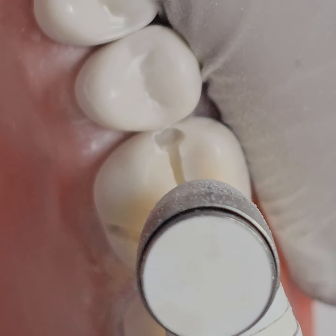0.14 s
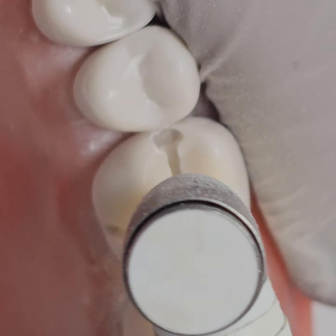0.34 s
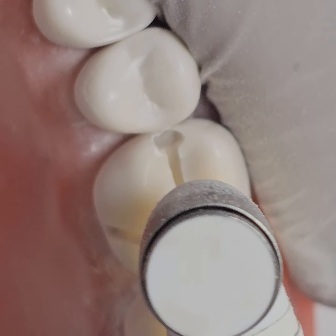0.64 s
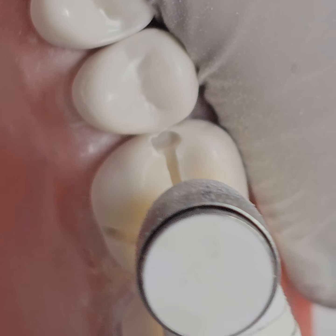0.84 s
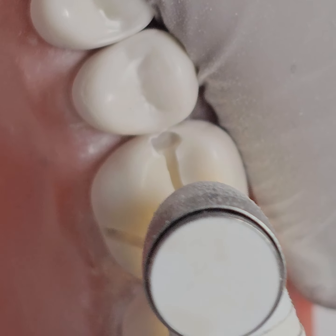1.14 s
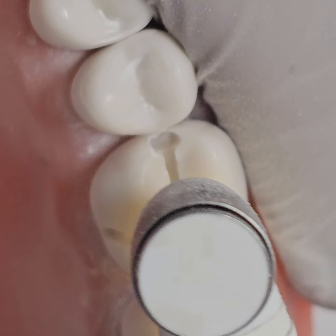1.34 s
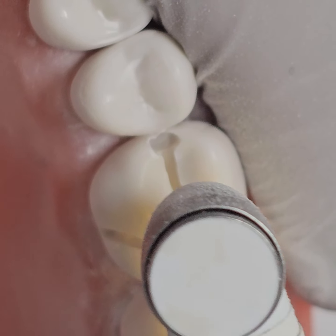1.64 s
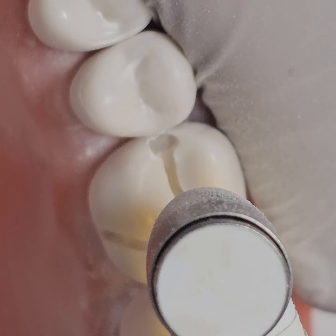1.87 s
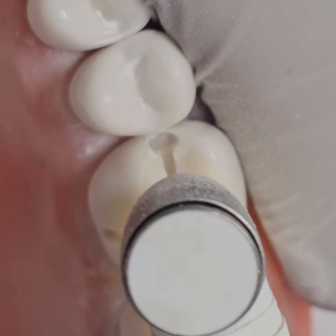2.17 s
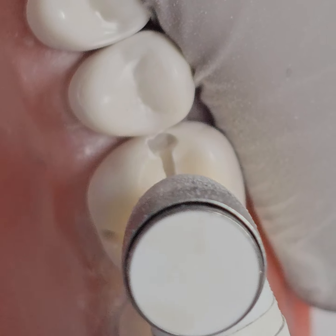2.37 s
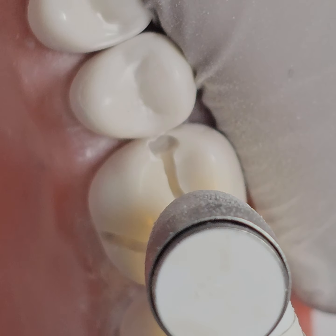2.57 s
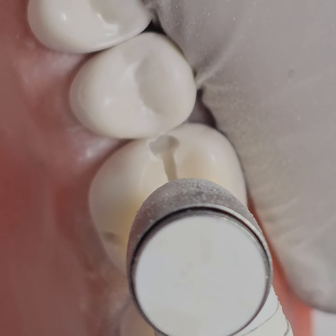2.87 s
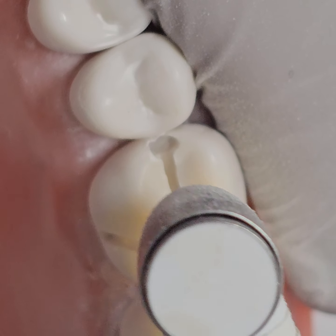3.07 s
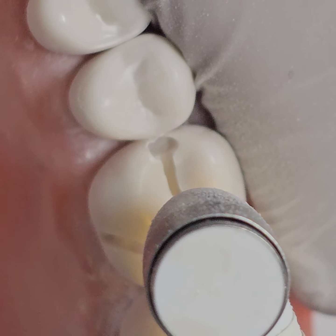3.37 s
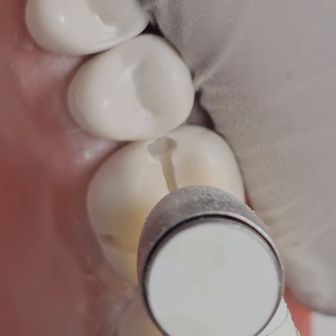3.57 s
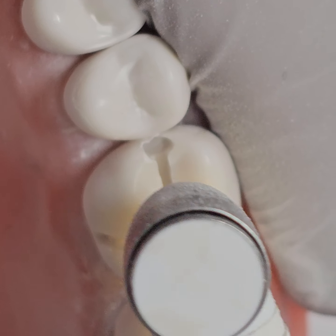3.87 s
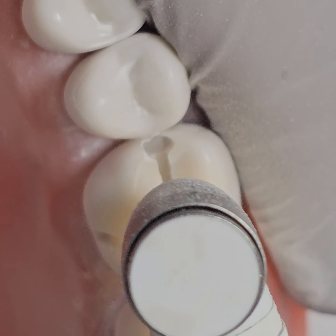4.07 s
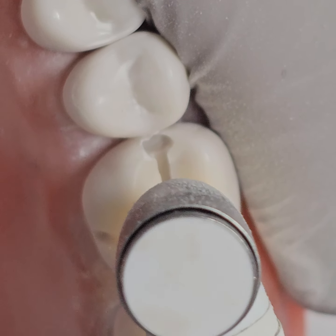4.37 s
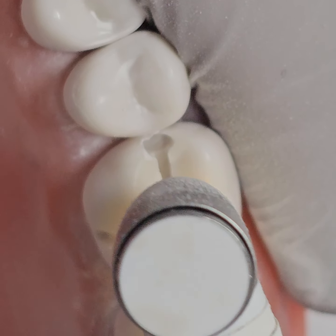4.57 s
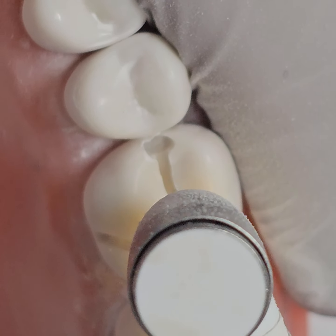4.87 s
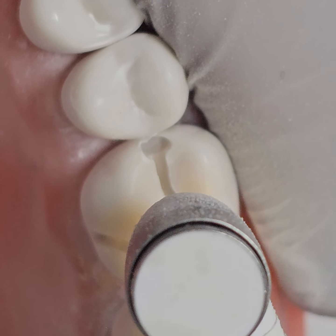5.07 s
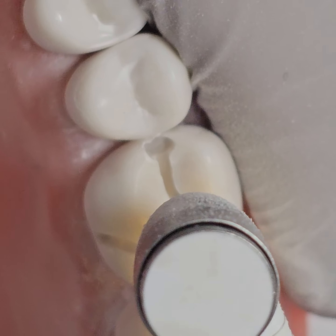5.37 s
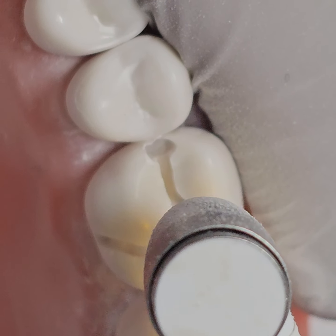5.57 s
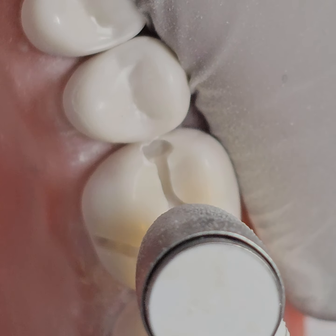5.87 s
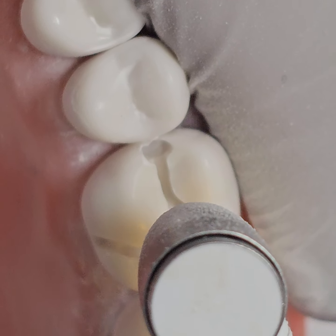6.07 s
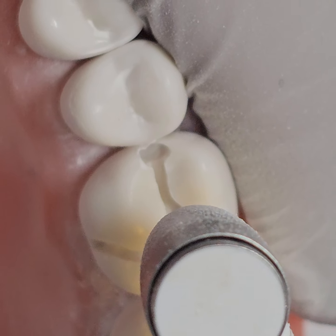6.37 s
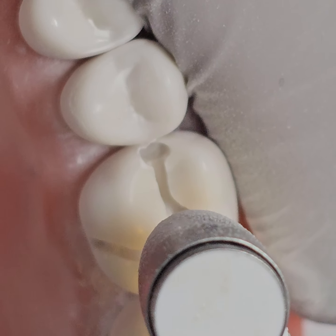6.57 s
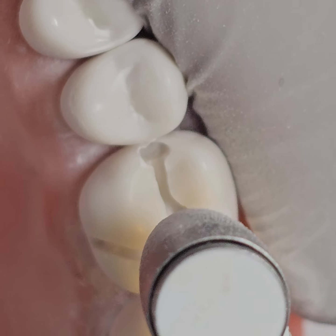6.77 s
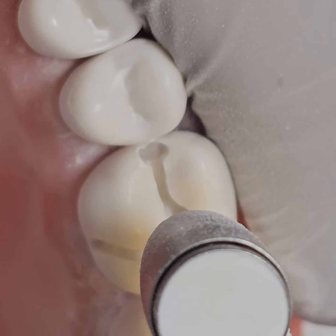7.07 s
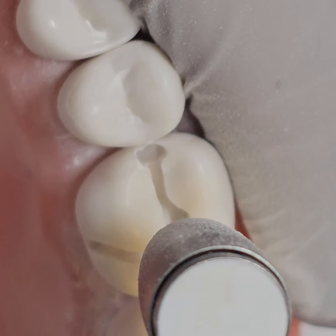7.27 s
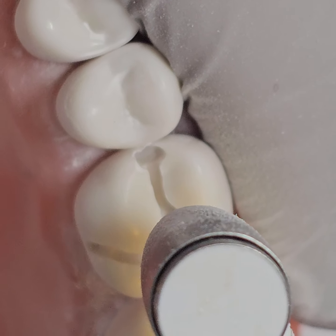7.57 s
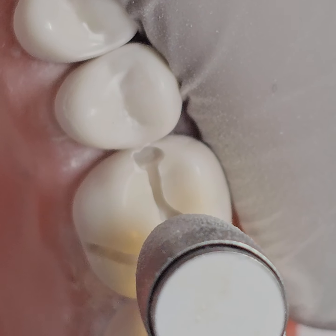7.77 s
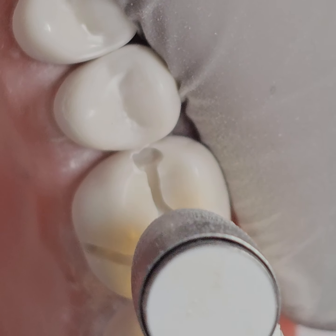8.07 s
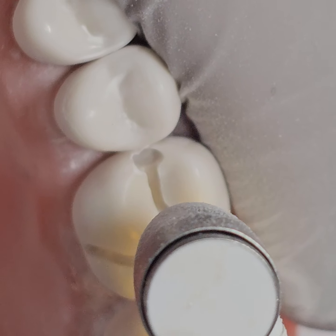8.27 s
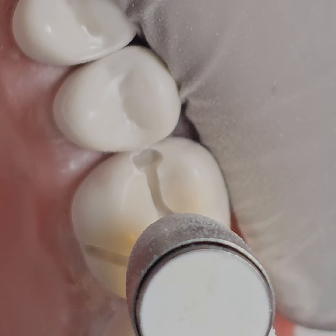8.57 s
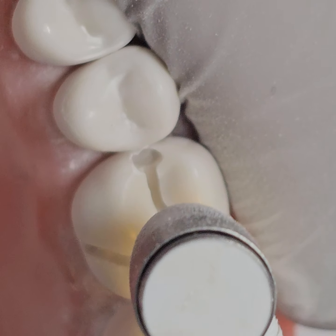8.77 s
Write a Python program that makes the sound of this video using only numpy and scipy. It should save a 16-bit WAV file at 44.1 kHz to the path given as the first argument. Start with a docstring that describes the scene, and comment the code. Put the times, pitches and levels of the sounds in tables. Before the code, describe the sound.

Close, high dental drill: bright air hiss, glassy squeals swelling and fading as the bur grooves a tooth, over faint low room hum.

```python
"""In a dental surgery, an air turbine spins up to about 2050 turns a second and grooves a tooth in strokes.
The rotor whines on its shaft orders, built from sines locked to a speed that sags under each bite.
The bur squeals on orders six and seven as it bites, and stays faint on them between strokes.
Shaped noise makes the hissing drive air and the rumbling room; sines add thin whistles and hum.
One close microphone feeds the left channel; the right is all but silent."""
import sys
import numpy as np
from scipy.fft import rfft, irfft, next_fast_len
from scipy.io import wavfile
from scipy.ndimage import map_coordinates

SR = 44100
rng = np.random.default_rng(int(sys.argv[2]) if len(sys.argv) > 2 else 0)


def bounce(signal):
    """Save signal as a 16-bit WAV file at the path given by the first command-line argument."""
    frames = np.transpose(np.atleast_2d(signal))
    limited = np.clip(frames, -1, 1)
    pcm = np.round(limited * 32767).astype(np.int16)
    wavfile.write(sys.argv[1], SR, pcm)


N = 392931
TIME_S = np.arange(N) / SR

# All levels in the tables are ahead of the channel gains in scene().
# rotor running free, spinning up and levelling off: start_s [s], speed_hz [turns per second]
FREE_SPEED = [(0, 1661), (0.1, 1788), (0.18, 1863), (0.31, 1967), (0.43, 2004), (0.65, 2043), (1.1, 2049),
              (1.7, 2067), (2.3, 2060), (3.1, 2070), (4.4, 2072), (4.8, 2078), (5.05, 2063), (5.85, 2070),
              (6.7, 2061), (8.9, 2054)]
# bearing tone below the shaft rate: start_s [s], level_db [dB rms]
LOW_BEARING = [(0, -75), (.5, -63.5), (1.5, -62), (2.2, -61.5), (4, -60.5), (6, -62.5), (7, -69),
               (7.6, -71.5), (8.9, -68)]
# slow swell of the escaping air: start_s [s], exhaust_rush_db [dB], nozzle_fizz_db [dB]
AIR_SWELL = [(0, 0.5, 1.5), (.2, -1.1, -.8), (1.2, -1, -.4), (2.6, -.8, -1.1), (5.05, -1, -1),
             (5.3, -.9, 0), (7.9, -1.03, 0), (8.9, -1, 0)]
# spectrum of the exhaust rush before the cavity: pitch_hz [Hz], relative_level_db [dB per Hz]
RUSH_SPECTRUM = [(200, -21), (700, -30), (1300, -23), (2000, -17.5), (3000, -15.5), (4000, -12),
                 (5800, -11.5), (7000, -5), (8000, -3.5), (9300, 2), (9900, -4.5), (10600, -15),
                 (12000, -38), (16000, -48)]
# spectrum of the nozzle fizz before the cavity: pitch_hz [Hz], relative_level_db [dB per Hz]
FIZZ_SPECTRUM = [(9000, -72), (10700, -19), (10950, -10.5), (11400, -11), (12050, -7.5), (12500, 0),
                 (14000, 1.5), (15900, 2), (16500, -40)]
# spectrum of the room rumble: pitch_hz [Hz], relative_level_db [dB per Hz]
RUMBLE_SPECTRUM = [(10, -37), (20, -32), (33, 1.5), (55, 1), (70, -5.5), (110, -3.5), (160, -6), (215, -7),
                   (240, -14), (280, -14.5), (340, -25), (500, -31), (800, -45), (3000, -80)]
# peaks and hollows of the head and the mouth around it: pitch_hz [Hz], width_hz [Hz], level_db [dB]
CAVITY_PEAKS = [(798, 130, 5), (2263, 184, -11.5), (2570, 220, -5.5), (2800, 114, 4), (2850, 77, 1),
                (3387, 104, -6.5), (3450, 66, 3), (4320, 100, -4), (6850, 150, -0.5), (6980, 290, -3.5),
                (7410, 340, 2.5), (10770, 220, -3.5), (11580, 170, 7), (12900, 180, 3), (13400, 170, 4),
                (13940, 240, 0.5), (14200, 300, -0.5), (15640, 320, 3)]
# hum of room machinery: pitch_hz [Hz], level_db [dB rms]
ROOM_HUM = [(33.5, -59), (44.3, -53.5), (103, -63), (141, -63.5), (153.2, -53.5), (218, -61.5)]
# thin steady whistles in the air flow: pitch_hz [Hz], level_db [dB rms]
AIR_WHISTLES = [(9894, -70), (11527, -53.5), (11883, -50)]
# strokes of the bur on the tooth, before their contours: start_s [s], length_s [s],
# hardest_bite [0-1 of the length], speed_sag_hz [Hz], order_6_squeal_db [dB], order_7_squeal_db [dB],
# imbalance_whine_db [dB], bearing_whine_db [dB]
BUR_STROKES = [(0.258, 0.35, 0.27, 1.05, -26.5, -29.0, -52, -62.0),
               (0.486, 0.2, 0.8, 5.5, -23.5, -28.5, -50, -55),
               (0.804, 0.38, 0.9, 5.4, -22.5, -25.5, -52, -60),
               (1.29, 0.18, 0.6, 9.2, -21.5, -25.5, -51.5, -62.0),
               (1.452, 0.22, 0.75, 11.7, -20.5, -23.0, -53, -60),
               (1.679, 0.212, 0.56, 2.2, -33.5, -37.0, -65, -58),
               (2.08, 0.14, 0.84, 17.7, -22, -26.5, -53, -54),
               (2.241, 0.26, 0.8, 2.3, -19.0, -23.0, -53.5, -54),
               (2.74, 0.3, 0.5, 3.1, -21.5, -28.5, -54.0, -57),
               (2.946, 0.18, 0.88, 2.7, -22.5, -24.5, -56.0, -54.5),
               (3.281, 0.29, 0.65, 4.4, -20.5, -32, -53, -58),
               (3.487, 0.19, 0.83, 1.0, -24.0, -30.0, -58, -57.5),
               (3.818, 0.12, 0.6, 11, -31, -32.5, -61, -62.0),
               (3.938, 0.27, 0.96, 7.1, -21.5, -24.5, -56, -55.0),
               (4.31, 0.23, 0.6, 8.6, -25.5, -34.0, -56.5, -61),
               (4.516, 0.18, 0.9, 14.5, -22.5, -38.5, -48, -46.5),
               (5.179, 0.11, 0.99, 7.0, -34, -31.5, -54.5, -43.5),
               (5.511, 0.29, 0.8, 15.0, -21, -36, -61, -53.5),
               (5.91, 0.09, 0.2, 18.0, -38.0, -32.0, -59, -52.0),
               (6.13, 0.3, 0.8, 18.0, -21.5, -37, -59.5, -49),
               (6.55, 0.25, 0.94, 10.0, -39, -36.0, -57.5, -51.5),
               (6.92, 0.12, 0.7, 24, -26, -36.5, -70.5, -45),
               (7.177, 0.31, 0.91, 10.0, -31, -31.0, -57, -50),
               (7.61, 0.43, 0.74, 5.9, -30.5, -29.0, -60.0, -47),
               (8.15, 0.11, 0.64, 9.7, -33, -43.5, -59.5, -51),
               (8.272, 0.13, 0.7, 11.7, -24.5, -37.5, -54.5, -44.5),
               (8.376, 0.48, 0.58, 1.07, -39, -46.0, -47.5, -52)]
# floor of the whine with no load on the bur: start_s [s], imbalance_db [dB], bearings_db [dB]
IDLE_WHINE = [(0, -56, -55), (.3, -56.5, -55.5), (1.78, -52.5, -56.5), (1.9, -63, -65), (2.65, -63.5, -63),
              (3.2, -56.5, -58), (3.8, -62, -71), (5.1, -63.5, -64), (6.2, -65, -52), (8.9, -63, -54)]
# handpiece resonances the orders sweep through in the spin-up: pitch_hz [Hz], width_hz [Hz], level_db [dB rms]
HANDPIECE_RESONANCES = [(1910, 300, -48.5), (3480, 130, -50.5), (5480, 350, -47.5), (6900, 640, -38.5),
                        (7410, 83, -37.5), (8700, 640, -35), (9350, 400, -41), (10150, 310, -28),
                        (10800, 900, -41), (12440, 540, -24.5), (13900, 700, -29), (15000, 400, -35)]
# short bursts of whine at twice the shaft rate: start_s [s], length_s [s], level_db [dB]
SECOND_ORDER_BURSTS = [(.32, 0.14, -53), (0.568, .05, -48), (0.678, 0.046, -49), (0.868, 0.12, -55),
                       (1.135, 0.058, -49.5), (1.34, 0.075, -51), (1.64, 0.064, -53), (2.112, 0.11, -52),
                       (2.423, .08, -54), (2.777, 0.12, -55.5), (3.412, 0.054, -54), (4.489, .15, -47),
                       (4.67, .05, -48), (8.37, 0.296, -50.5)]
# slow drift of two overtones: start_s [s], order_4_db [dB over the bearing whine],
# order_5_db [dB over the mean of imbalance and order 6 squeal]
OVERTONE_DRIFT = [(0, 8, -1), (1.3, 11, -3), (2.5, 3, -7.5), (4.1, 5, -11), (4.6, -1, -14), (5.25, -6, -8),
                  (5.7, 6.5, -10), (7.3, 8.5, -3), (8.3, 4, -8), (8.9, 2, -13)]

BITE_S, LIFT_S = 0.07, 0.068  # the bur sinks in, and comes away
WHINE_LIFT_S = 0.13  # the side load on the rotor eases more slowly
RECOVERY = 0.5  # share of the sag that the rotor wins back by the end of a stroke
SECOND_DB = -60.5  # order 2 under load, outside its bursts
ARCH_DB = 3  # the bearing whine is this much louder in mid-stroke than at the ends
SLOPE_DB = 10.5  # the squeal falls this much per stroke length before and after the hardest bite
SPIN_UP_S, SETTLE_S = 0.25, 0.07  # resonances ring this long, then die away
CUT_RUSH_DB, CUT_FIZZ_DB = 0.5, 0.45  # more hiss while the bur cuts
BURST_EDGE_S = 0.032  # rise and fall of a burst
TOP_HZ = 15770  # nothing passes from here up


def amp(db):
    """Decibels to gain."""
    return 10 ** (np.asarray(db) / 20)


def unit(x):
    """Scaled to rms 1."""
    return x / np.sqrt(np.mean(x ** 2) + 1e-20)


def along(points, hz):
    """Interpolates (Hz, value) points on a log frequency axis."""
    point_hz, values = np.transpose(points)
    return np.interp(np.log(hz + 1), np.log(point_hz + 1), values)


def curves(rows):
    """One value per sample for each column after the time."""
    times, *columns = np.transpose(rows)
    return [np.interp(TIME_S, times, column) for column in columns]


def wobble(rate):
    """A smooth random curve, rate knots a second."""
    coarse = np.arange(0, N, 8)
    knots = rng.standard_normal(int(N * rate / SR) + 4)
    curve = map_coordinates(knots, [coarse * rate / SR])
    return np.interp(np.arange(N), coarse, curve)


def filtered(x, response):
    """x times a response of frequency."""
    size = next_fast_len(N + SR // 2)
    spectrum = rfft(x, size) * response(np.fft.rfftfreq(size, 1 / SR))
    return irfft(spectrum, size)[..., :N]


def noise(colour):
    """Noise of rms 1 whose spectrum in dB follows colour(Hz)."""
    return unit(filtered(rng.standard_normal(N), lambda hz: amp(colour(hz))))


def tone(angle, rough, flutter_rate):
    """A partial of rms 1; a rough part flutters in size and phase."""
    phase = angle + rng.uniform(0, 2 * np.pi)
    in_phase = (1 + rough * wobble(flutter_rate)) * np.sin(phase)
    quadrature = rough * wobble(flutter_rate) * np.cos(phase)
    return unit(in_phase + quadrature)


def steady(lines, rough, flutter_rate):
    """Wavering tones of fixed pitch from (Hz, dB) rows."""
    return sum(amp(db) * tone(2 * np.pi * hz * TIME_S, rough, flutter_rate) for hz, db in lines)


def ease(u):
    """A smooth step from 0 to 1 as u goes from 0 to 1."""
    return np.sin(np.pi / 2 * np.clip(u, 0, 1)) ** 2


def bell(hz, centre, width):
    """A resonance hump of height 1; width spans its half-height points."""
    return 2 ** -((2 * (hz - centre) / width) ** 2)


def shaft():
    """Rotor speed in Hz: each stroke drags it down, and uneven drag makes it tremble."""
    free_hz, = curves(FREE_SPEED)
    recovering = lambda progress, _: 1 - RECOVERY * np.minimum(progress, 1)
    sag_hz = pressing([row[3] for row in BUR_STROKES], LIFT_S, recovering)
    slow_tremble_hz = 1.43 * wobble(14)
    return (free_hz - sag_hz + slow_tremble_hz) * (1 + 0.00054 * wobble(45))


def rotor(speed_hz, angle):
    """Imbalance sings at the shaft rate, bearings on multiples and one tone below; side load raises the orders."""
    *_, sixth_db, _, imbalance_db, bearings_db = np.transpose(BUR_STROKES)
    idle_imbalance, idle_bearings = amp(curves(IDLE_WHINE))
    fourth_gain, fifth_gain = amp(curves(OVERTONE_DRIFT))
    arch = lambda progress, _: amp(ARCH_DB * (1 / 3 - (2 * np.minimum(progress, 1) - 1) ** 2))

    imbalance = np.maximum(idle_imbalance, pressing(amp(imbalance_db), WHINE_LIFT_S))
    bearings = np.maximum(idle_bearings, pressing(amp(bearings_db), LIFT_S, arch))
    loaded_second = amp(SECOND_DB) * pressing(np.ones(len(BUR_STROKES)), WHINE_LIFT_S)
    second = np.maximum(loaded_second, bursts())
    fifth = fifth_gain * pressing(amp((imbalance_db + sixth_db) / 2), WHINE_LIFT_S)

    fundamental = np.hypot(imbalance, flare(speed_hz)) * amp(wobble(16))
    whine = fundamental * tone(angle, rough=0.11, flutter_rate=50)
    for order, size in enumerate([second, bearings, fourth_gain * bearings, fifth], 2):
        flicker = unit(amp(1.56 * wobble(24)))  # play in the bearings makes each overtone come and go
        level = np.hypot(size * flicker, flare(order * speed_hz))
        whine += level * tone(order * angle, rough=0.18, flutter_rate=76)

    low_bearing_db, = curves(LOW_BEARING)
    return whine + amp(low_bearing_db) * tone(0.8517 * angle, rough=0.12, flutter_rate=30)


def flare(hz):
    """While the rotor gathers speed, an order at hz flares whenever it passes a resonance."""
    ringing = ease(1 - (TIME_S - SPIN_UP_S) / SETTLE_S)
    early, size = ringing > 0, np.zeros(N)
    size[early] = sum(amp(db) * bell(hz[early], centre, width) for centre, width, db in HANDPIECE_RESONANCES)
    return ringing * size


def bur(speed_hz, angle):
    """Contact drives the two orders nearest the bur's resonances and grit makes them chatter."""
    *_, sixth_db, seventh_db, _, _ = np.transpose(BUR_STROKES)
    bite = lambda progress, hardest: amp(-SLOPE_DB * np.abs(progress - hardest))
    sizes = []
    for stroke_db in (sixth_db, seventh_db):
        size = np.maximum(amp(-47), pressing(amp(stroke_db), LIFT_S, bite))  # faint floor between strokes
        sizes.append(size * amp(1.17 * wobble(28) - 0.2))
    sizes.append(0)  # order 8 rings only in the spin-up

    squeal = np.zeros(N)
    for order, size in enumerate(sizes, 6):
        chatter = amp(0.6 * wobble(420))
        partial = unit(chatter * tone(order * angle, rough=0.06, flutter_rate=73))
        squeal += np.hypot(size, flare(order * speed_hz)) * partial
    return squeal


def air():
    """Exhaust rush and nozzle fizz, slightly turbulent and louder in the cut, with thin whistles."""
    rush_db, fizz_db = curves(AIR_SWELL)
    cutting = pressing(np.ones(len(BUR_STROKES)), LIFT_S)
    rush_gain = amp(rush_db + CUT_RUSH_DB * cutting - 36.5 + 0.43 * wobble(40))
    fizz_gain = amp(fizz_db + CUT_FIZZ_DB * cutting - 27.5 + 0.56 * wobble(60))
    rush = rush_gain * noise(lambda hz: along(RUSH_SPECTRUM, hz) + cavity(hz))
    fizz = fizz_gain * noise(lambda hz: along(FIZZ_SPECTRUM, hz) + cavity(hz))
    return rush + fizz + steady(AIR_WHISTLES, rough=0.78, flutter_rate=30)


def cavity(hz):
    """The colour in dB that the head and mouth give to the air."""
    return sum(db * bell(hz, centre, width) for centre, width, db in CAVITY_PEAKS)


def room():
    """Steady machinery: a low rumble with wavering hum tones."""
    rumble = amp(-47.5) * noise(lambda hz: along(RUMBLE_SPECTRUM, hz))
    return steady(ROOM_HUM, rough=0.35, flutter_rate=5) + rumble


def pressing(sizes, lift_s, contour=lambda progress, hardest: 1):
    """Every stroke bites, follows a contour along its length and lifts off; the larger wins an overlap."""
    total = np.zeros(N)
    for (start, length, hardest, *_), size in zip(BUR_STROKES, sizes):
        span = slice(*np.searchsorted(TIME_S, [start, start + length + lift_s]))
        age = TIME_S[span] - start
        bite_and_lift = ease(age / BITE_S) * ease(1 - (age - length) / lift_s)
        shape = bite_and_lift * contour(age / length, hardest)
        total[span] = np.maximum(total[span], size * shape)
    return total


def bursts():
    """Size of the short bursts on order 2: each rises, holds and falls."""
    total = np.zeros(N)
    for start, length, db in SECOND_ORDER_BURSTS:
        whole_s = length + BURST_EDGE_S
        span = slice(*np.searchsorted(TIME_S, [start, start + whole_s]))
        age = TIME_S[span] - start
        total[span] += amp(db) * ease(np.minimum(age, whole_s - age) / BURST_EDGE_S)
    return total


def scene():
    """Everything reaches one microphone on the left channel; the right is all but silent."""
    speed_hz = shaft()
    angle = 2 * np.pi * np.cumsum(speed_hz) / SR
    microphone = rotor(speed_hz, angle) + bur(speed_hz, angle) + air() + room()
    return np.array([amp(6) * microphone, amp(-66) * microphone])


def record(dry):
    """A sharp band limit removes everything from TOP_HZ up."""
    return filtered(dry, lambda hz: hz < TOP_HZ)


dry = scene()
out = record(dry)
bounce(out)
```